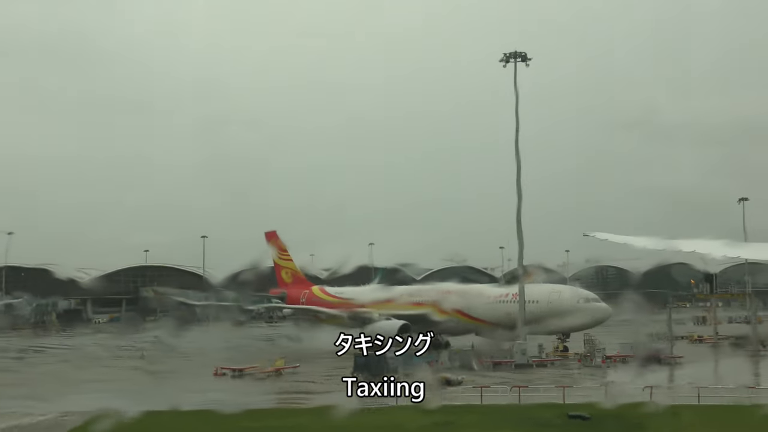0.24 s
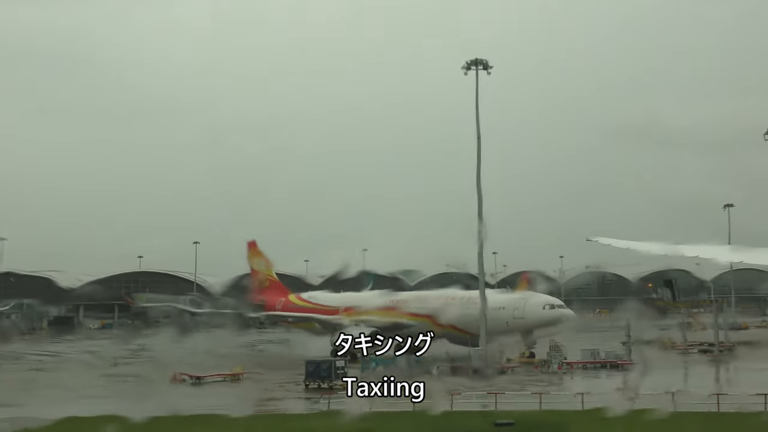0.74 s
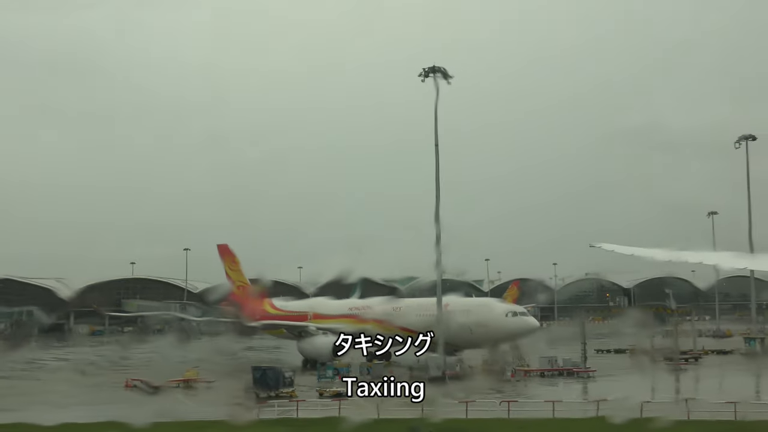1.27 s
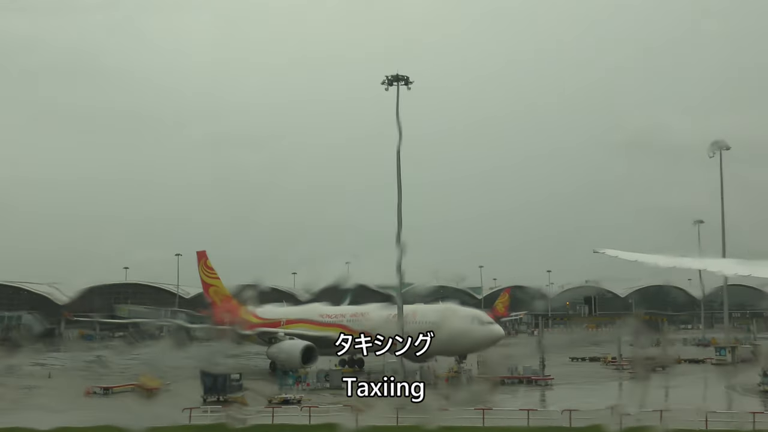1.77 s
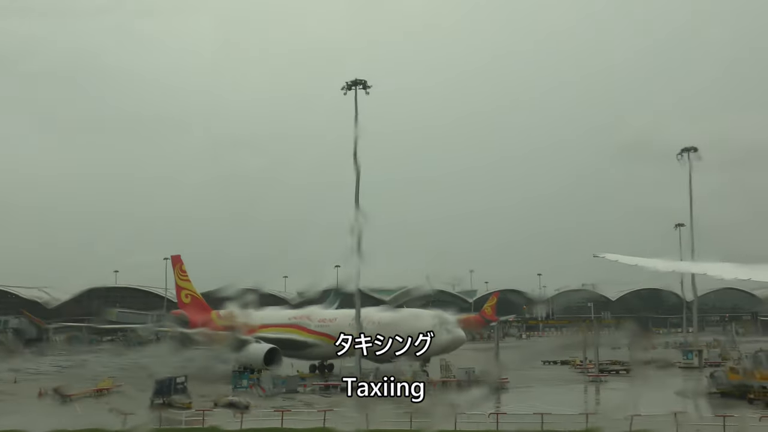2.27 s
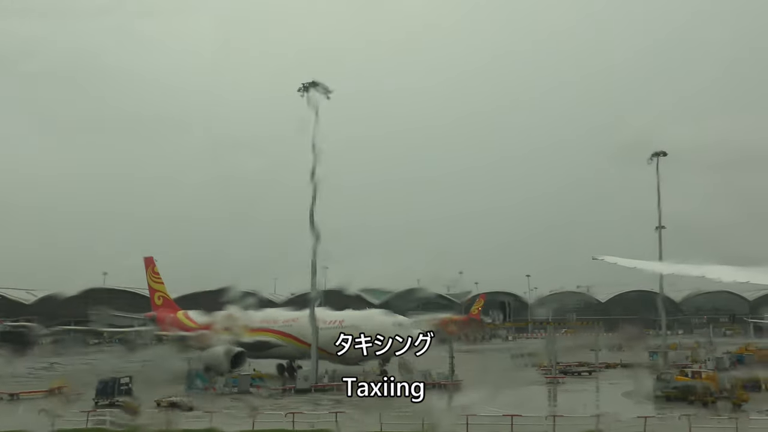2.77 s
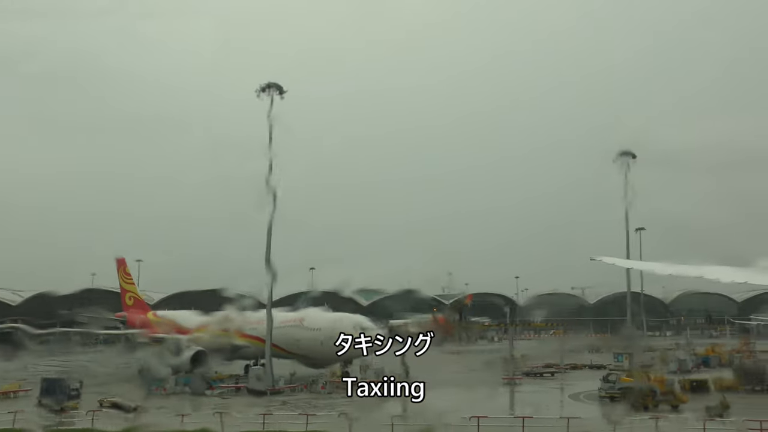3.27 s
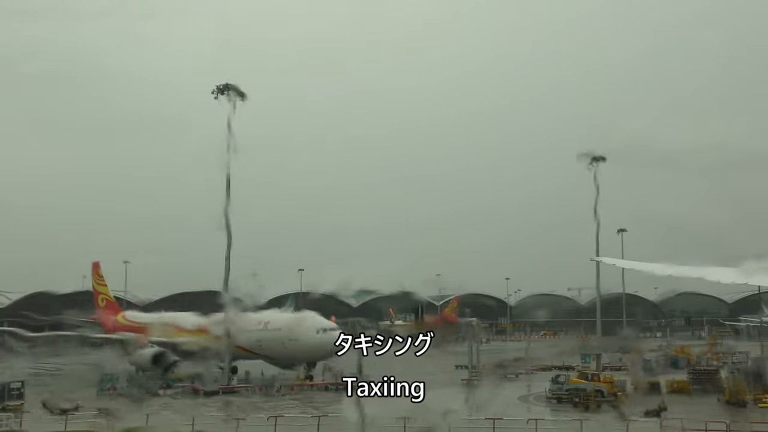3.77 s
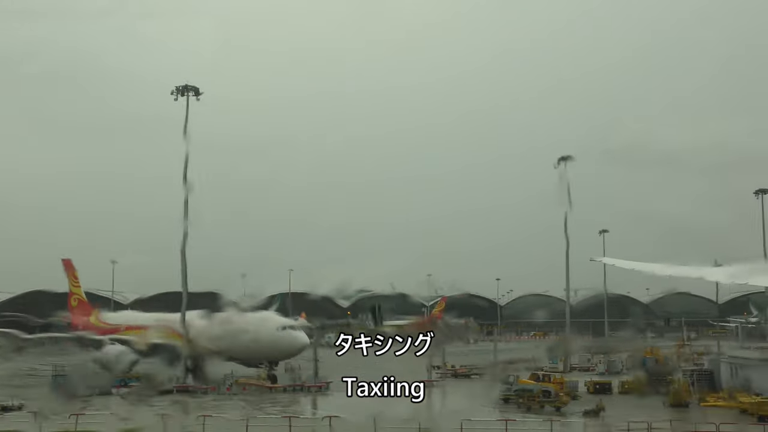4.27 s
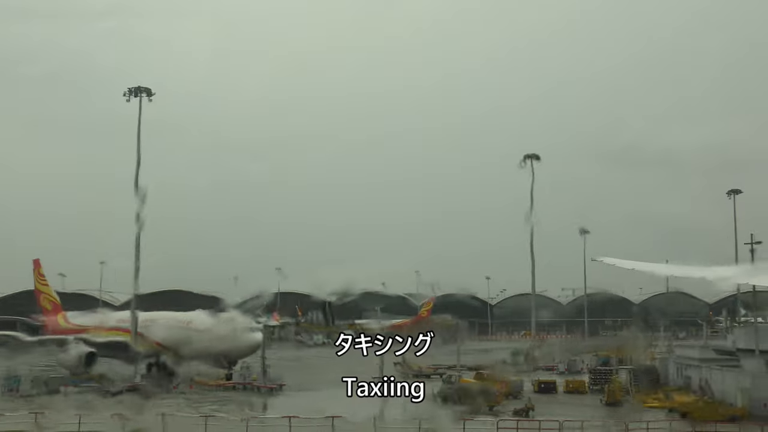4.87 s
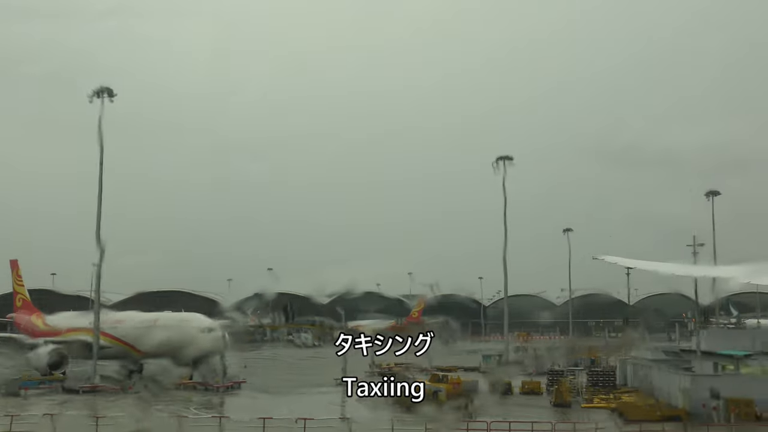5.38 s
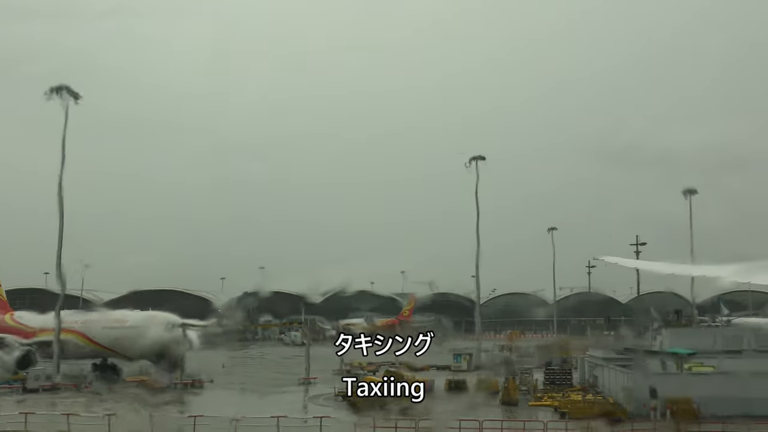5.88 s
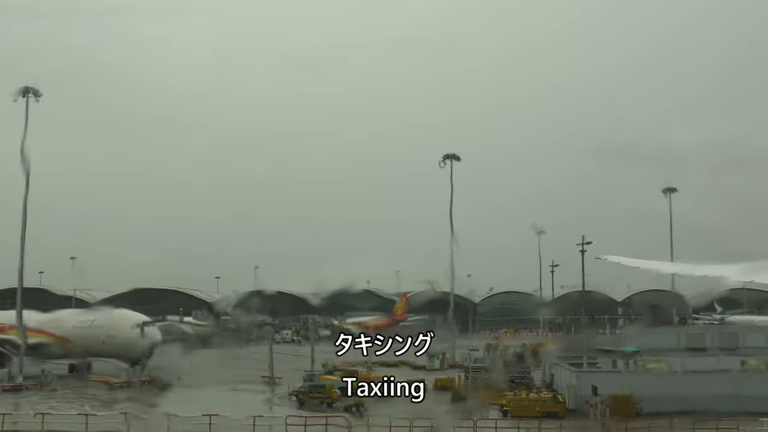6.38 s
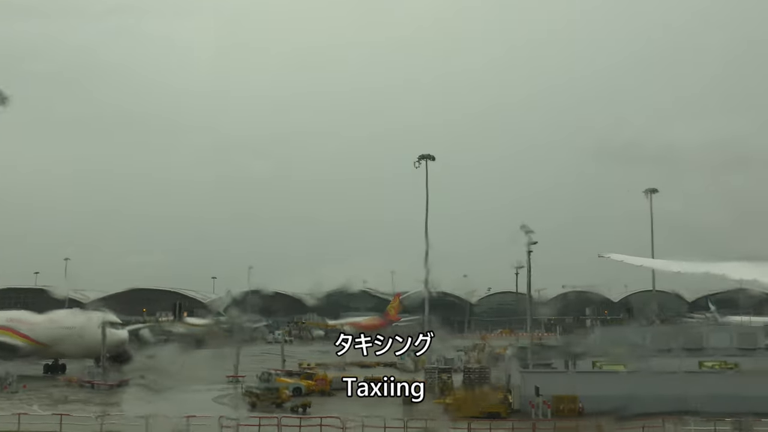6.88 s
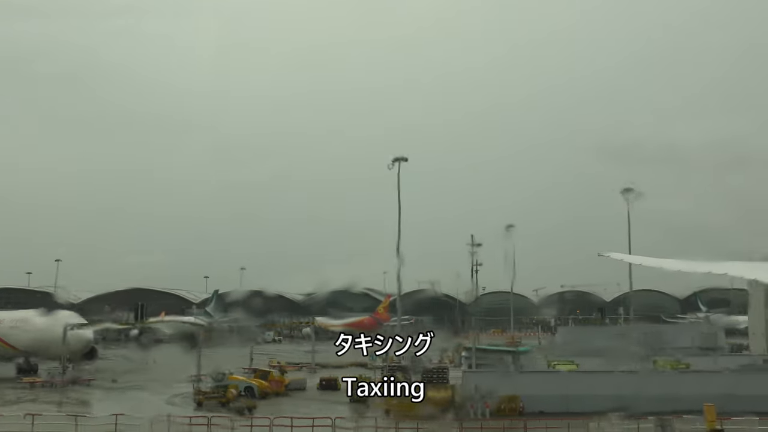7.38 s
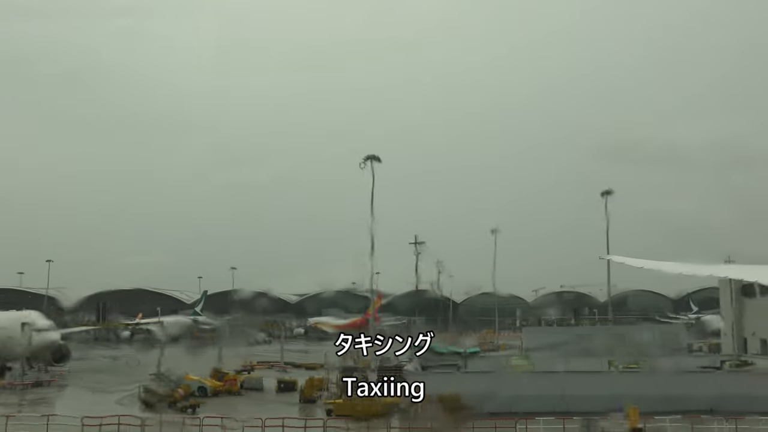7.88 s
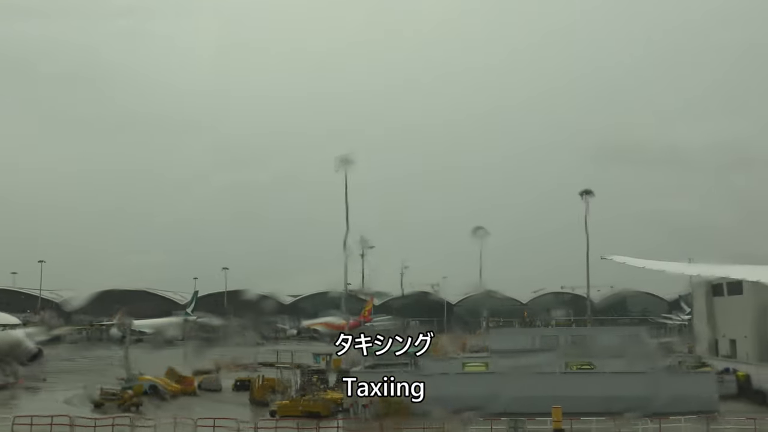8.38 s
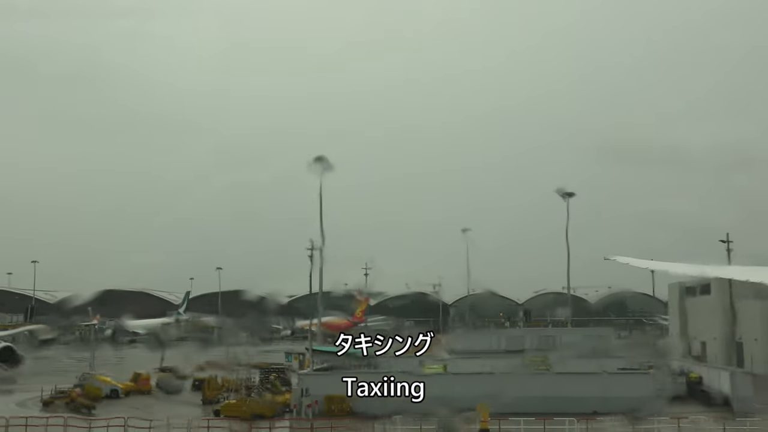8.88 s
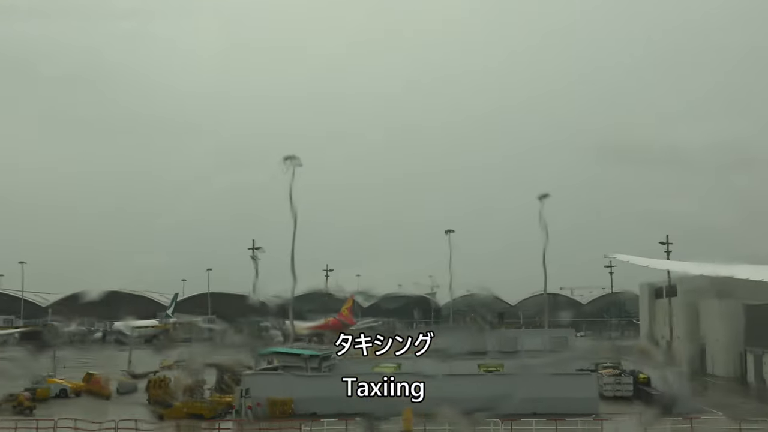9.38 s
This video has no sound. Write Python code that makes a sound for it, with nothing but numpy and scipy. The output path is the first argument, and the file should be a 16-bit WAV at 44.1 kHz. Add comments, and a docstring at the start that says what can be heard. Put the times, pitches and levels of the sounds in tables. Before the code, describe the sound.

Steady low rumble and throbbing engine hum inside a taxiing airliner, with faint trim squeaks and a brief plastic crackle.

```python
"""Inside a taxiing airliner: two engines settle to idle, and their slightly different hums beat
against each other. Under them are the rumble of the plane's body, hiss from the air vents, droning
shafts and a thin pump whine. A piece of trim squeaks as it sticks and slips, and something plastic
crackles, rustles and bumps a panel. The microphone's fast gain control turns it all down on each beat."""
import sys
import numpy as np
from scipy import signal
from scipy.fft import rfft, irfft
from scipy.io import wavfile
from scipy.ndimage import uniform_filter1d

SR = 44100
rng = np.random.default_rng(int(sys.argv[2]) if len(sys.argv) > 2 else 0)


def pcm_store(signal):
    """Save signal as 16-bit PCM."""
    levels = np.round(np.clip(np.atleast_2d(signal), -1, 1) * 32767)
    wavfile.write(sys.argv[1], SR, levels.astype(np.int16).T)


N = 424683

# Engine power above idle, dying away: time_s, share (0 to 1)
EXTRA_POWER = [(0, 1), (.5, 0.65), (.9, 0.56), (1.05, 0.56), (1.3, 0.5), (1.7, 0.73), (1.83, .2),
               (2.4, 0.19), (4, 0)]
# Engine rumble through the plane's body: pitch_hz, base_level_db (per Hz)
RUMBLE_SPECTRUM = [(22, -50), (46, -56), (63, -49), (100, -53), (140, -50), (185, -45), (215, -52),
                   (238, -43), (270, -46), (284, -44), (310, -43), (345, -45), (362, -51), (395, -60),
                   (900, -120)]
# Air from the vents: pitch_hz, base_level_db (per Hz)
VENT_SPECTRUM = [(250, -71), (420, -60), (620, -66.5), (1100, -69.5), (1700, -66), (1900, -68.5),
                 (2050, -71.5), (2700, -75.5), (3900, -82.5), (6000, -84), (7600, -92.5), (10500, -94),
                 (13000, -97.5), (15700, -105)]
# The strongest shaft drone swells, then sinks as the hums arrive: time_s, level_db
MAIN_SHAFT = [(0, -21.5), (.5, -21.5), (.9, -18), (1.05, -25), (1.35, -26), (1.7, -22), (1.85, -29.5),
              (2.5, -26.5), (9.63, -28)]
# Shafts, fans and electrics: pitch_hz, base_level_db, pitch_waver_hz, level_waver_db
STEADY_DRONES = [(87.3, -31, .4, 1.5), (151, -29, .7, 2.5), (472.2, -52, .4, 2), (1416.6, -58.5, 1.2, 2),
                 (1707, -55, 1.5, 2), (2361, -55.5, 1.5, 1.5), (4722, -70, 2.5, 2), (10987, -75, 1, 2),
                 (11999, -82, 1, 2), (12317, -83, 1, 2), (13103, -84, 1, 2), (13521, -84, 1, 2),
                 (14070, -83, 1, 2)]
# The slowing pump's ninth harmonic (nine times its turning rate): time_s, pitch_hz, level_db
PUMP_NINTH = [(0, 8226, -62), (.3, 8200, -56), (.6, 8165, -51), (.85, 8134, -51), (1.1, 8108, -58),
              (1.42, 8074, -57), (1.9, 8053, -54), (2.9, 8045, -55), (9.63, 8044, -55)]
# The pump's harmonics: multiple, level_vs_ninth_db, extra_at_top_speed_db
PUMP_HARMONICS = [(1, 0, 17), (2, 3, 0), (3, -5, 2), (4, -15, 0), (8, -16, 21), (9, 0, 0), (10, -11, 3),
                  (11, -25, 4)]
# Plastic snaps: start_s, crack_peak_db, pitch_hz, knock_peak_db
PLASTIC_SNAPS = [(.181, -36, 10000, -41), (1.085, -35, 9800, -39), (1.623, -35, 9900, -32),
                 (1.681, -37, 11000, -42), (3.18, -36, 11000, -48), (3.655, -41, 7000, -50),
                 (3.763, -34, 4800, -37), (5.13, -36, 8800, -30), (7.841, -33, 8000, -27),
                 (7.850, -23, 5000, -25), (7.8588, -16, 8000, -25), (7.8635, -23, 7500, -29),
                 (7.8972, -11.5, 7500, -28), (7.9155, -20, 7000, -21), (7.932, -34, 4500, -26),
                 (7.942, -25, 6500, -26), (7.955, -33, 10000, -40), (8.052, -45, 4000, -26),
                 (8.075, -48, 4000, -28), (8.103, -31, 7000, -30), (8.107, -40, 5000, -25),
                 (8.211, -31, 8960, -48), (8.217, -21.5, 7700, -27), (8.36, -34, 10300, -28),
                 (9.18, -37, 9600, -35)]
# The trim's high ringing tones, before a rub bends and widens them: pitch_hz, width_hz, gain_db
TRIM_RINGS = [(6350, 170, 2), (6620, 520, -16), (7000, 300, -19), (7450, 300, -22), (9300, 500, -31),
              (11800, 900, -33)]
# Rubs of the trim: start_s, length_s, first_ring_hz, high_level_db, low_level_db, widening (times)
TRIM_RUBS = [(.5, .065, 6750, -48, -54, 2), (2.222, .05, 6300, -46, -52, 4),
             (2.357, .032, 6270, -40.5, -62, 1), (2.416, .015, 6270, -43, -64, 1),
             (2.45, .06, 6290, -54, -70, 2), (2.545, .02, 6350, -49, -62, 1.5),
             (2.59, .015, 6300, -52, -62, 2), (2.672, .012, 6300, -48, -66, 1),
             (2.74, .06, 6350, -52, -68, 2), (2.805, .01, 6720, -53, -68, 1),
             (2.925, .11, 6250, -47.5, -58, 4), (3.04, .1, 6400, -48.5, -58, 3),
             (3.24, .03, 6380, -48, -66, 2), (3.355, .04, 6440, -47, -64, 1.5),
             (3.464, .03, 6330, -50, -66, 2), (3.652, .115, 6300, -48, -60, 4),
             (3.775, .09, 6300, -52, -62, 3), (3.885, .07, 6570, -49, -66, 2),
             (3.96, .035, 6300, -51, -66, 3), (4.005, .11, 6350, -49, -62, 4),
             (4.12, .07, 6400, -57, -66, 3), (4.2, .025, 6300, -50, -64, 2), (4.24, .08, 6250, -57, -68, 3),
             (7.6, .013, 6200, -48, -54, 4), (7.613, .011, 6420, -43, -44, 4),
             (7.627, .02, 6400, -51, -51, 3), (2.275, .08, 6300, -53, -64, 4),
             (2.5, .24, 6400, -54, -64, 4), (3.29, .06, 6400, -55, -66, 3), (3.4, .09, 6400, -56, -66, 3)]
# Each engine's hum slides down to idle through the cabin's resonances: time_s, pitch_hz, level_db
NEAR_ENGINE = [(1.05, 390, -57.5), (1.36, 367, -29.5), (1.62, 352, -28.5), (1.76, 343, -17),
               (1.95, 341, -18), (2.18, 335, -11.5), (2.7, 332.4, -13), (3.4, 333, -12.5), (4.1, 329, -12),
               (4.7, 329.2, -13.5), (5.05, 331.5, -15.5), (5.9, 330.3, -12), (6.35, 332, -13.5),
               (7.1, 329.8, -13.5), (7.57, 329.2, -12.5), (7.8, 330.7, -15), (8.6, 330, -12.5),
               (9.25, 331.5, -15), (9.63, 329.5, -12.5)]
FAR_ENGINE = [(.98, 358.3, -40), (1.09, 347.1, -22.5), (1.24, 333, -21.5), (1.42, 331, -19),
              (1.7, 324.6, -22), (1.921, 322, -19.5), (2.2, 320.5, -27), (2.6, 318, -28), (3, 317.5, -21.5),
              (3.8, 317, -26.5), (4.501, 316, -21.5), (5.2, 314.5, -19.5), (5.9, 316, -21.5),
              (6.3, 315.7, -18), (7.2, 315.3, -20.5), (7.8, 314.5, -17.5), (8.8, 314.7, -19),
              (9.63, 313.5, -20)]
# Plastic rustling between snaps: start_s, swell_s, fade_s, top_level_db
PLASTIC_RUSTLES = [(7.832, 0.014, 0.044, -35), (7.916, .01, .04, -45)]
# Bumps against the panel: start_s, peak_db
PANEL_BUMPS = [(7.842, -26), (7.849, -26), (7.860, -29), (7.922, -30), (7.942, -35)]
# The microphone's two openings: pitch_hz, likeness (0 to 1), left_lead_rad, left_minus_right_db
MIC_PORTS = [(35, .98, -1.0, 5.9), (70, .99, -.8, 3.9), (250, .98, -.87, -.5), (380, .98, -.7, -.9),
             (470, .66, -1.4, -2.8), (560, .58, -1.6, -6.3), (680, .3, -.9, -9.4), (850, .32, -3.6, -5.5),
             (1050, .33, -5.15, -5), (1350, .53, -5.6, -2.5), (1750, .56, -5.7, -.5), (2300, .54, -6, -.8),
             (4000, .5, -6, 1), (5200, .66, -6.16, .8), (7000, .97, -6.28, 0), (10000, .7, -6.25, .2),
             (14000, .7, -6.25, 0)]


def amp(db):
    """Turn decibels into a number to multiply by."""
    return 10 ** (np.asarray(db) / 20)


def in_time(rows):
    """Join a table's points into one curve in time for each column after the first."""
    times, *columns = np.transpose(rows)
    return [np.interp(np.arange(N) / SR, times, column) for column in columns]


def at_hz(rows, column, size=N):
    """Read a column at every frequency of a spectrum, joining its points on a log scale."""
    hz = np.maximum(np.arange(size // 2 + 1) * SR / size, 1)
    table = np.array(rows)
    return np.interp(np.log(hz), np.log(table[:, 0]), table[:, column])


def drift(rate_hz):
    """A smooth random wobble, about 1 in size."""
    r = np.exp(-80 * np.pi * rate_hz / SR)  # one step every 40 samples
    slow = signal.lfilter([1], [1, -2 * r, r * r], rng.standard_normal(N // 40 + 2002))[2000:]
    return np.interp(np.arange(N) / 40, np.arange(len(slow)), slow / slow.std())


def sine(hz, db):
    """A pure tone whose pitch and average (rms) level can move."""
    return np.sqrt(2) * amp(db) * np.sin(2 * np.pi * (np.cumsum(hz) / SR + rng.random()))


def resonate(x, hz, width_hz, passes=1):
    """Let a sound ring around one pitch; a smaller width rings longer."""
    r = np.exp(-np.pi * width_hz / SR)
    feedback = [1, -2 * r * np.cos(2 * np.pi * hz / SR), r * r]
    for _ in range(passes):
        x = signal.lfilter([(1 - r * r) / 2, 0, (r * r - 1) / 2], feedback, x + 1e-18)
    return x


def spread(noise, own_share=.45):
    """Make left and right from three noises: one shared, and one for each side."""
    return np.sqrt(1 - own_share ** 2) * noise[0] + own_share * noise[1:]


def surrounding_noise(spectrum):
    """Noise from all around, partly the same on the left and right."""
    white = rfft(rng.standard_normal((3, N)))
    shared, left, right = white * amp(at_hz(spectrum, column=1)) * np.sqrt(SR / 2)
    alike = at_hz(MIC_PORTS, column=1)
    return irfft(np.sqrt(alike) * shared + np.sqrt(1 - alike) * np.array([left, right]), N)


def settling_db(idle_db, extra_db, db_per_s):
    """A level change that follows engine power, plus a slow steady slope."""
    return idle_db + extra_db * in_time(EXTRA_POWER)[0] + db_per_s * np.arange(N) / SR


def engine_rumble():
    """The engines shake the plane's body, making a low noise."""
    gain_db = settling_db(idle_db=.95, extra_db=4.3, db_per_s=.22) + .5 * drift(.53)
    return amp(gain_db) * surrounding_noise(RUMBLE_SPECTRUM)


def vent_hiss():
    """Air rushes from the vents and softens as the engines settle."""
    gain_db = settling_db(idle_db=-2.05, extra_db=7.55, db_per_s=.082) + .85 * drift(3.3)
    return amp(gain_db) * surrounding_noise(VENT_SPECTRUM)


def machine_drones():
    """Shafts, fans and electrics hold tones that waver a little in pitch and level."""
    gain_db = settling_db(idle_db=-1.9, extra_db=7.2, db_per_s=-.024)
    out = sine(hz=131.75 + .52 * drift(2.96), db=in_time(MAIN_SHAFT)[0] + 1.5 * drift(6.3))
    for hz, db, waver_hz, waver_db in STEADY_DRONES:
        out += sine(hz + waver_hz * drift(2.88), db + gain_db + waver_db * drift(8.1))
    return out


def pump_whine():
    """A pump sings at whole multiples of its turning rate; some are louder while it is still fast."""
    ninth_hz, db = in_time(PUMP_NINTH)
    fast = (ninth_hz - ninth_hz.min()) ** 2 / np.ptp(ninth_hz) ** 2
    turn_hz = (ninth_hz + 1.5 * drift(2.5)) / 9
    return sum(sine(turn_hz * multiple, db + offset_db + extra_db * fast + 1.3 * drift(6.3))
               for multiple, offset_db, extra_db in PUMP_HARMONICS)


def plastic_snaps(rise_s=.0012, crack_fade_s=.012, tail_fade_s=.06, knock_fade_s=.045):
    """Each snap is a bright crack with a faint tail, plus a duller knock in the object's body."""
    out, t = np.zeros((2, N)), np.arange(SR // 10) / SR
    rise = np.minimum(t / rise_s, 1)
    shape = rise * (amp(-60 * t / crack_fade_s) + amp(-15 - 60 * t / tail_fade_s))
    crack_band = signal.butter(3, [3700, 11200], "band", fs=SR, output="sos")
    for start_s, crack_db, hz, knock_db in PLASTIC_SNAPS:
        noise = rng.standard_normal((4, len(t)))
        burst = spread(noise[1:]) * shape
        ring = amp(3) * resonate(burst, hz=4100, width_hz=200)
        crack = signal.sosfilt(crack_band, resonate(burst, hz, 1.1 * hz) + ring)
        push = resonate(noise[0] * rise * amp(-60 * t / knock_fade_s), hz=1500, width_hz=3000)
        knock = resonate(push, 750, 500) - .74 * resonate(push, 1500, 1500) + 1.3 * resonate(push, 2600, 500)
        at = round(start_s * SR)
        out[:, at:at + len(t)] += amp(crack_db) * crack / np.abs(crack).max()
        out[:, at:at + len(t)] += amp(knock_db) * knock / np.abs(knock).max()
    return out


def trim_squeak(rise_s=.004, fade_db_per_s=800):
    """Trim sticks and slips, which makes it ring; pressure bends and damps the ringing from rub to rub."""
    slips = rng.standard_normal(N) * amp(2 * drift(40))
    out, t = np.zeros(N), np.arange(SR // 3) / SR
    (first_hz, first_width, first_db), *upper = TRIM_RINGS
    for start_s, length_s, rub_hz, high_db, low_db, widen in TRIM_RUBS:
        bend = rub_hz / first_hz
        at = slice(round(start_s * SR), round(start_s * SR) + len(t))
        # As the first ring widens, the upper ones grow stronger.
        rings = [(first_hz, first_width * widen, first_db - 10 * np.log10(widen))]
        rings += [(hz, width, db + 4 * widen) for hz, width, db in upper]
        high = sum(amp(db) * resonate(slips[at], hz * bend, width, passes=2) for hz, width, db in rings)
        low = resonate(slips[at], hz=4550, width_hz=600, passes=2)
        shape = np.minimum(t / rise_s, 1) * amp(-fade_db_per_s * np.maximum(t - length_s, 0))
        out[at] += shape * (amp(high_db) * high / high.std() + amp(low_db) * low / low.std())
    return out


def engine_hums(waver_hz=.8, near_waver_db=.8, far_waver_db=1.5):
    """Two engines turn a few percent apart in speed, so their tones throb, or beat, together."""
    out = 0
    for engine, waver_db in ((NEAR_ENGINE, near_waver_db), (FAR_ENGINE, far_waver_db)):
        hz, db = in_time(engine)
        out = out + sine(hz + waver_hz * drift(3.04), db + waver_db * drift(4.7))
    return out


def plastic_rustle(fade_db=9):
    """The plastic gives off a grainy noise that swells, fades and stops."""
    grain = spread(rng.standard_normal((3, N))) * amp(2.6 * drift(150))
    grain = resonate(grain, hz=2800, width_hz=5200)
    t, shape = np.arange(N) / SR, 0
    for start_s, swell_s, fade_s, db in PLASTIC_RUSTLES:
        corners_s = np.cumsum([start_s, swell_s, fade_s, swell_s])
        shape = shape + amp(db) * np.interp(t, corners_s, [0, 1, amp(-fade_db), 0])
    return shape * grain / grain.std()


def panel_thuds(rise_s=.0012, fade_s=.07):
    """The object bumps a panel: each short push of noise stirs one low, dull ring."""
    out, t = np.zeros(N), np.arange(SR // 10) / SR
    shape = np.minimum(t / rise_s, 1) * amp(-60 * t / fade_s)
    for start_s, db in PANEL_BUMPS:
        thud = resonate(rng.standard_normal(len(t)) * shape, hz=800, width_hz=600, passes=2)
        at = round(start_s * SR)
        out[at:at + len(t)] += amp(db) * thud / np.abs(thud).max()
    return out


def microphone_ports(pair, pad=4096):
    """Each opening colours and shifts the sound that reaches it; the average of both keeps its level."""
    pair = np.pad(pair, ((0, 0), (pad, pad)), mode="reflect")  # stops the ends wrapping round
    size = pair.shape[1]
    alike, lead, lean_db = (at_hz(MIC_PORTS, column, size) for column in (1, 2, 3))
    average = np.sqrt(amp(lean_db) + amp(-lean_db) + 2 * alike * np.cos(lead)) / 2
    left = amp(lean_db / 2) * np.exp(.5j * lead)
    return irfft(rfft(pair) * [left, 1 / left] / average, size)[:, pad:-pad]


def scene():
    """Everything in the cabin, as the microphone's two openings pick it up."""
    plane = engine_rumble() + vent_hiss() + engine_hums() + pump_whine() + machine_drones()
    return microphone_ports(plane + trim_squeak() + panel_thuds() + plastic_snaps() + plastic_rustle())


def record(dry):
    """Gain control turns loud moments down fast and comes back more slowly; the top treble is cut."""
    threshold_db, squeeze, attack_s, release_db_per_s = -19.5, .74, .0036, 110.5
    power = uniform_filter1d(np.mean(dry ** 2, axis=0), size=130)
    over_db = np.maximum(10 * np.log10(np.abs(power) + 1e-12) - threshold_db, 0)
    over_db[0] = over_db[:SR // 20].max()  # the control is already at work
    release_db = release_db_per_s * np.arange(N) / SR
    held_db = np.maximum.accumulate(over_db + release_db) - release_db
    r = np.exp(-1 / (attack_s * SR))
    smooth_db = signal.lfilter([1 - r], [1, -r], held_db, zi=[r * held_db[0]])[0]
    fade_in = np.minimum(np.arange(N) / (.004 * SR), 1)
    treble_cut = signal.ellip(12, .5, 60, 15720, fs=SR, output="sos")
    return signal.sosfilt(treble_cut, dry * amp(-squeeze * smooth_db) * fade_in)


dry = scene()
out = record(dry)
pcm_store(out)
```